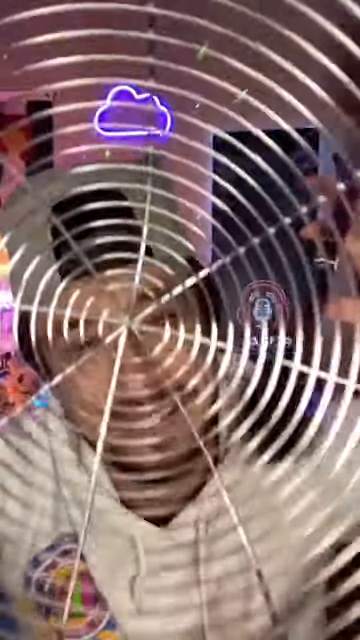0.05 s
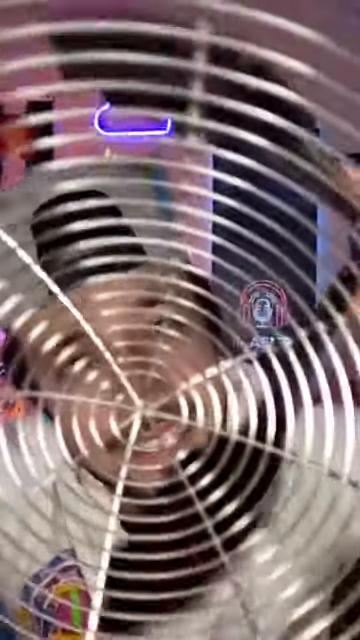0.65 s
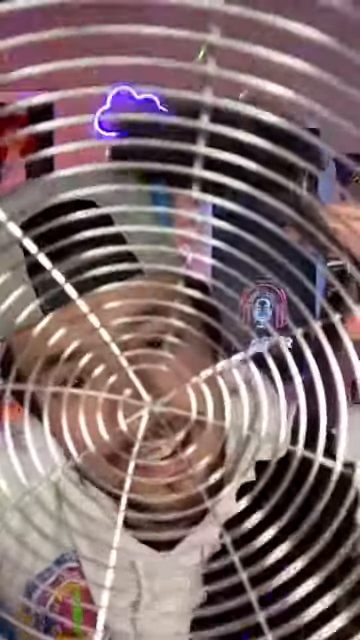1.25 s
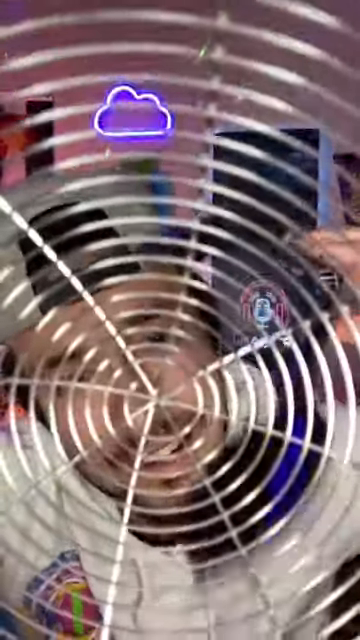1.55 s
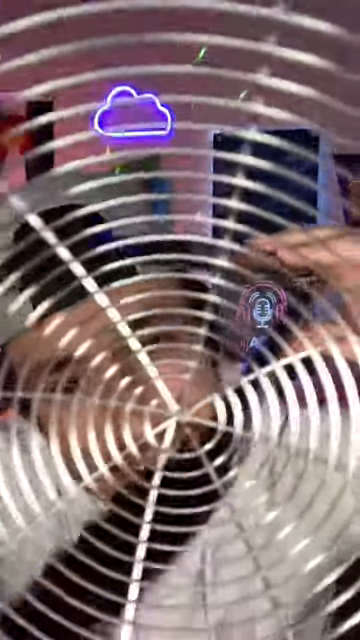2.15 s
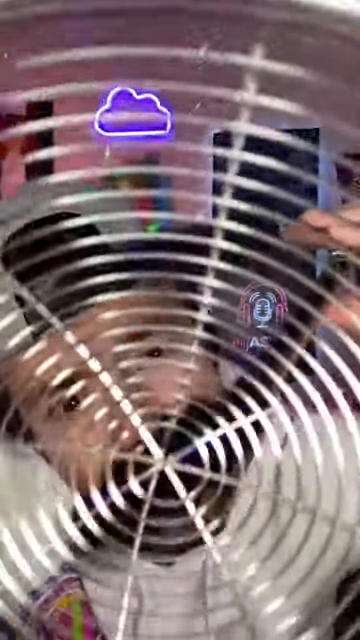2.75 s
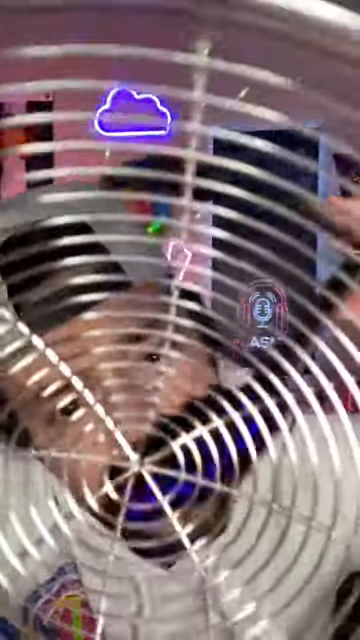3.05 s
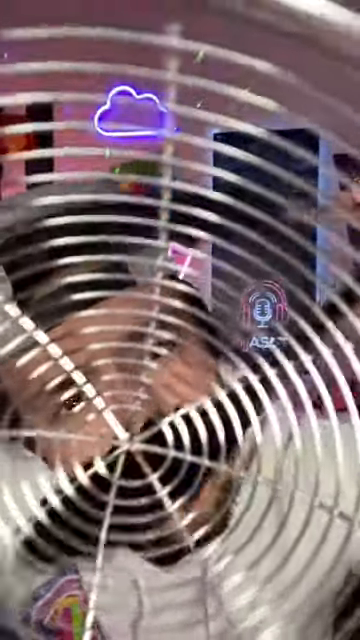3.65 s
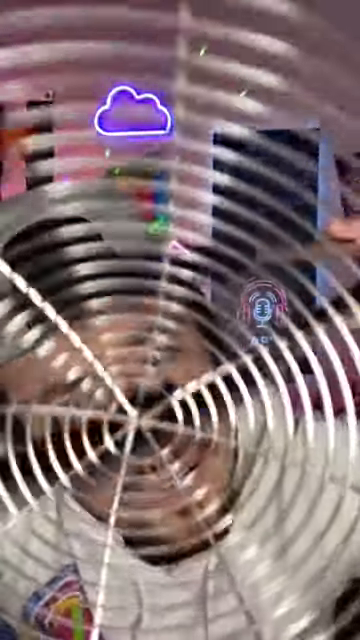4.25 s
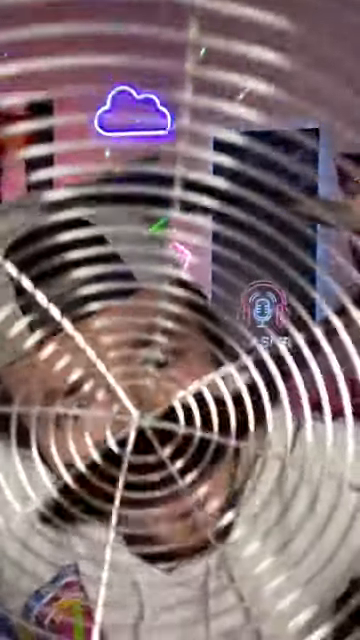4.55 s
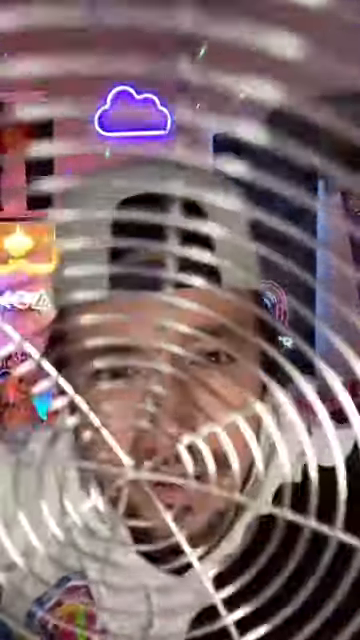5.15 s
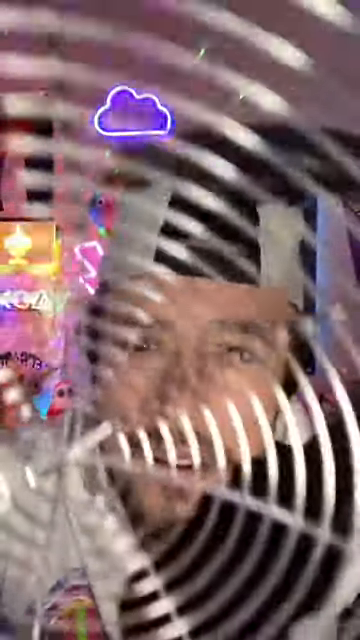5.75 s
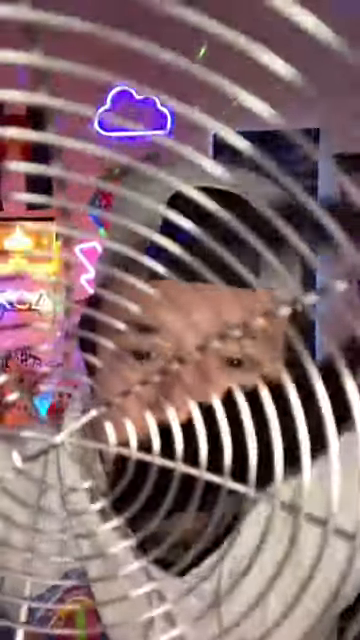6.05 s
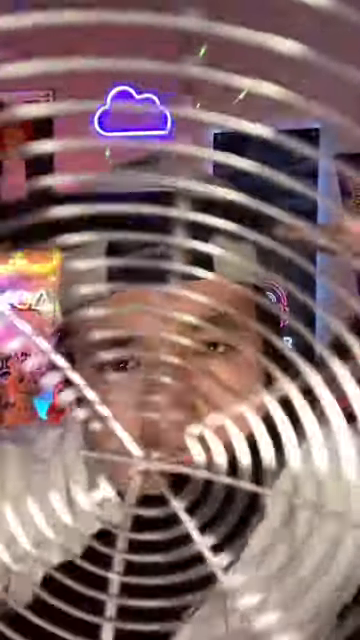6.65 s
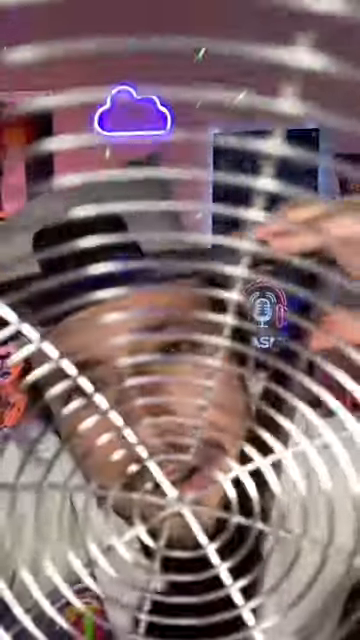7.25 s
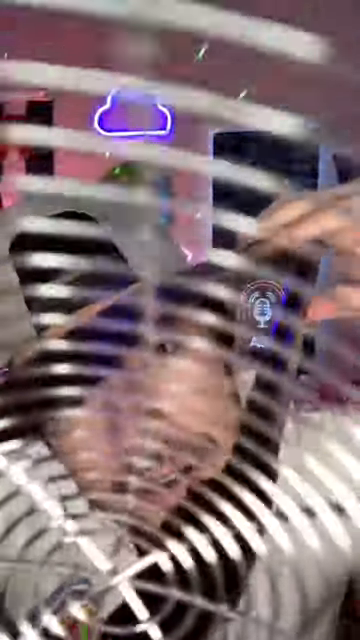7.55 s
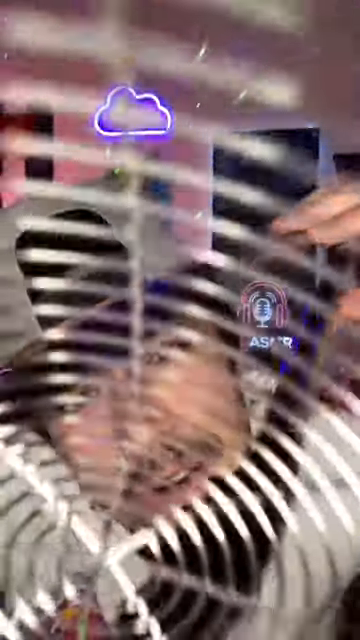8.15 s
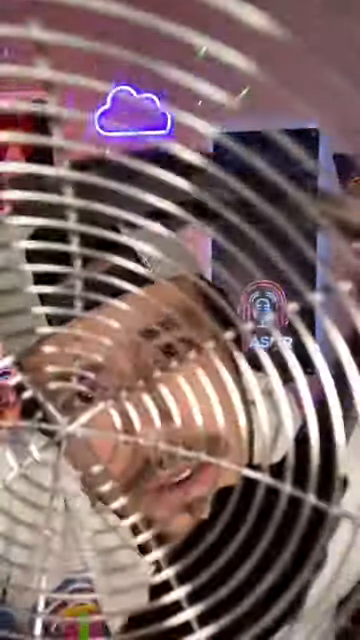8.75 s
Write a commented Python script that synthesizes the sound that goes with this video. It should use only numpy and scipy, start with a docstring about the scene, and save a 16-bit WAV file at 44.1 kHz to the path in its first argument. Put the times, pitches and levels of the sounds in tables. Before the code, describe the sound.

Close, uneven scraping and plucking of nails on a metal wire strainer, its wires ticking and ringing briefly over soft knocks.

```python
"""A faint room rumble, then close clicks: fingernails pick and scrape at a steel wire strainer.
Each wire that slips off a nail is released with an impulse, which knocks the basket and leaves the
other wires in free vibration. Between the clicks, sliding friction makes the nail grate along the steel.
Now and then a finger's weight sets the frame booming, or skin squeaks by stick-slip motion."""
import sys
import numpy as np
from scipy import signal
from scipy.fft import rfft, irfft, next_fast_len
from scipy.io import wavfile
from scipy.ndimage import uniform_filter1d

SR = 44100
rng = np.random.default_rng(int(sys.argv[2]) if len(sys.argv) > 2 else 0)


def wav_record(signal):
    """Record a signal, one row per channel, as 16-bit PCM in the file named by sys.argv[1]."""
    frames = np.transpose(np.atleast_2d(signal))
    bounded = np.clip(frames, -1, 1)
    # unit amplitude maps onto the largest positive 16-bit level
    quanta = np.round(bounded * 32767).astype(np.int16)
    wavfile.write(sys.argv[1], SR, quanta)


N = 388521


def amp(db):
    """Amplitude ratio of a level in decibels."""
    return 10 ** (np.asarray(db) / 20)


def unit(x):
    """Normalisation to rms 1."""
    return x / np.sqrt(np.mean(x ** 2) + 1e-20)


def along(points, hz):
    """Interpolation of (f/Hz, value) points on a logarithmic frequency axis."""
    f, v = np.transpose(points)
    return np.interp(np.log(hz + 1), np.log(np.sort(f)), v)


def clock(length):
    """Uniform sampling times over a length in seconds."""
    return np.arange(int(length * SR)) / SR


def fade(t, t60):
    """Exponential decay, 60 dB in t60 seconds."""
    return np.exp(-np.log(1000) * t / t60)


def add(track, s, sound):
    """Superposition of a sound on a track at time s."""
    part = track[max(int(s * SR), 0):][:len(sound)]
    part += sound[:len(part)]


def through(x, response):
    """Convolution with an impulse response scaled to unit energy."""
    return signal.fftconvolve(x, response / np.linalg.norm(response))[:N]


def colour(x, points, size=4096):
    """Minimum-phase filtering to a given spectrum, conserving the power of white noise."""
    cepstrum = irfft(np.log(amp(along(points, np.fft.rfftfreq(size, 1 / SR)))))
    cepstrum[1:size // 2] *= 2
    cepstrum[size // 2 + 1:] = 0
    return through(x, irfft(np.exp(rfft(cepstrum))))


def grit(count, spread_db=3):
    """Roughness noise of rms 1: tiny impacts of unequal size."""
    impacts = np.tanh(rng.standard_normal(count))
    return unit(impacts * amp(spread_db * np.clip(rng.standard_normal(count), -2, 2)))


# Background spectrum: f/Hz, relative level/dB
ROOM_SPECTRUM = [(20, -40), (60, 6.5), (85, -5), (200, -4), (450, -15), (1100, -20), (4000, -28),
                 (8000, -38), (16000, -34)]
def room(db=-63.0):
    """Stationary noise: a low rumble and faint hiss."""
    return amp(db) * unit(colour(rng.standard_normal(N), ROOM_SPECTRUM))


# Loudest slips of a nail off a wire: t/s, relative level/dB
LOUD_SLIPS = [(0.8744, -46.5), (0.905, -49.5), (1.104, -37), (1.1552, -38), (1.2275, -38.5),
              (1.2857, -35.5), (1.333, -39), (1.3509, -38.5), (1.412, -39.5), (1.4794, -37), (1.5298, -34),
              (1.5353, -36.5), (1.5644, -36.5), (1.9664, -32), (2.0097, -36.5), (2.0765, -39),
              (2.0995, -33), (2.1118, -34), (2.4137, -46), (2.6052, -47), (2.7465, -34.5), (2.7633, -29.5),
              (2.7813, -32.5), (2.8, -28.5), (3.1486, -48), (3.1877, -43), (3.2578, -44.5), (3.295, -31),
              (3.3541, -24.5), (3.8843, -37), (3.9655, -48.5), (4.0001, -47.5), (4.1348, -39),
              (4.2365, -28.5), (4.2947, -19.5), (4.4119, -32.5), (4.6338, -34), (4.724, -31),
              (4.7751, -33.5), (5.0843, -48.5), (5.1152, -40.5), (5.2142, -36), (5.232, -32.5),
              (5.2424, -31.5), (5.3029, -35.5), (5.4554, -40), (5.4776, -45), (5.691, -43.5),
              (5.726, -36.5), (5.8653, -30.5), (5.9284, -24.5), (5.9516, -27.5), (5.9827, -28.5),
              (6.2758, -40.5), (6.3099, -40.5), (6.3795, -37), (6.6512, -43.5), (6.6992, -40),
              (7.2133, -39.5), (7.265, -45), (7.4744, -37.5), (7.602, -39.5), (7.8417, -41.5), (8.059, -39),
              (8.2747, -37.5), (8.2901, -37), (8.522, -51.5), (8.6707, -30.5), (8.7379, -30),
              (8.8056, -28.5)]
def wire_slips(count=16, per_s=20, over_grating_db=1.5, spread_db=2):
    """Stick-slip events, loud ones and lesser ones along each stroke: t/s, click level/dB, knock level/dB."""
    rows = list(LOUD_SLIPS)
    for start, end, db, _, _ in NAIL_STROKES:
        times = start + (np.arange(count) + rng.random(count)) / per_s
        levels = db + over_grating_db - spread_db * rng.standard_normal(count)
        rows += [(s, level) for s, level in zip(times, levels) if s < end]
    s, db = np.transpose(rows)
    _, weight_db = finger(s)
    return np.column_stack([s, db, db + weight_db])


def clicks(slips, creep_db=-16, chatter_db=-6, rebound_s=0.003, gain_db=-13.0):
    """Elastic release: the nail creeps over a wire and snaps free; the wire chatters against the ribs."""
    force, t = np.zeros(N), clock(0.06)
    burst = lambda t60: unit(grit(len(t)) * fade(t, t60))
    for s, db, _ in slips:
        level = amp(db + gain_db)
        add(force, s - len(t) / SR, level * amp(creep_db) * burst(t60=0.023)[::-1])  # swells to the snap
        add(force, s, level * burst(t60=0.011))
        add(force, s + rebound_s * rng.random(), level * amp(chatter_db) * burst(t60=0.02))
    return force


# Spectrum of the direct sound: f/Hz, relative level/dB
CONTACT_SPECTRUM = [(60, -10.5), (250, -12.5), (550, 9), (760, 3), (960, -4), (1350, 2.5), (3200, 3),
                    (5400, -1), (6800, -7.5), (8300, -13), (15500, -15.5)]
def contact_sound(force):
    """Direct radiation: the nail's force is heard at once as clicks and grating."""
    return colour(force, CONTACT_SPECTRUM)


# Spectrum of the dense wire modes: f/Hz, relative level/dB
MESH_SPECTRUM = [(150, -21.5), (400, -1), (700, 3.5), (1000, -4.5), (1350, 0.5), (1900, -1.5), (3400, 2),
                 (5300, -4.5), (7500, -14.5), (15500, -19)]
# Their decay times: f/Hz, T60/s
MESH_DECAY = [(900, 0.29), (3000, 0.38), (7000, 0.26), (14000, 0.16)]
def mesh_ring(force, dense_db=-7, lingering_db=-15.0, lingering_t60=0.76):
    """Modal overlap: close wire modes merge into quickly decaying noise; a thinner cloud lingers."""
    hz, times, noise = signal.stft(rng.standard_normal(SR), SR, nperseg=256)
    decay = fade(times, along(MESH_DECAY, hz)[:, None])
    _, response = signal.istft(noise * decay, SR, nperseg=256)
    dense = colour(through(force, response), MESH_SPECTRUM)
    t = clock(0.72)
    tail = rng.standard_normal(len(t)) * fade(t, lingering_t60)
    lingering = colour(through(force, tail), [(700, -3), (1400, -8.0), (4800, -3.5), (12000, -29)])
    return amp(dense_db) * dense + amp(lingering_db) * lingering


# Least damped wire modes: f/Hz, relative level/dB
WIRE_MODES = [(1345, 0), (1480, -0.5), (2150, -4.5), (2466, 4), (2616, -0.5), (2740, -2.5), (2821, 0),
              (3144, 3), (3440, -0.5), (4086, 2), (4204, 0.5), (4301, -1.5), (4900, -0.5)]
def singing_wires(slips, gain_db=-39.0, t60=1.05, scatter_db=3.0):
    """Free vibration: the freest wires sing on, in a new balance after every click."""
    out, t = np.zeros(N), clock(1)
    hz, level = np.transpose(WIRE_MODES)
    modes = np.exp(2j * np.pi * hz[:, None] * t) * fade(t, t60)
    for s, db, _ in slips:
        strengths = amp(level + scatter_db * rng.standard_normal(len(hz)))
        phases = np.exp(1j * np.pi * rng.standard_normal(len(hz)))
        add(out, s, amp(db + gain_db) * ((strengths * phases) @ modes).real)
    return out


def struck(modes, attack_s, detune):
    """Modal superposition after one blow; the place of the finger shifts each pitch and strength."""
    t, ring = clock(0.25), 0
    for hz, db, t60 in modes:
        strength, shift, phase = rng.standard_normal(3)
        tone = np.sin(2 * np.pi * hz * (1 + detune * shift) * t + np.pi * phase)
        ring += amp(db + 2 * strength) * tone * fade(t, t60)
    return unit(ring * (1 - np.exp(-t / attack_s)))


# Bending modes of the basket: f/Hz, relative level/dB, T60/s
BASKET_MODES = [(86.3, -11.5, 0.2), (259, -6, 0.13), (379, 1, 0.039), (445.7, -6, 0.085),
                (551, -3.5, 0.062), (672, -20.5, 0.15), (761, -5, 0.038)]
def basket_knocks(slips, gain_db=-16):
    """Impulse excitation: each click kicks the whole basket."""
    out = np.zeros(N)
    for s, _, db in slips:
        add(out, s, amp(db + gain_db) * struck(BASKET_MODES, attack_s=0.00067, detune=0.055))
    return out


# Strokes of a nail over the wires, all levels relative: start t/s, end t/s, grating level/dB,
# edge level/dB (top treble), weight level/dB (basket knock against click)
NAIL_STROKES = [(0.876, 0.92, -49.5, 7, 0.5), (1.092, 1.247, -52.5, 1.5, -4.5),
                (1.274, 1.417, -49.5, 2.5, -4.5), (1.464, 1.571, -68, 4, -8), (1.97, 2.197, -44, -6.5, -11),
                (2.745, 2.841, -39.5, -2, -11.5), (3.18, 3.284, -56, 2, -5),
                (3.293, 3.348, -43.5, 5.5, -15.5), (3.665, 3.746, -51, -7.5, 2),
                (4.191, 4.361, -50, -8.5, -25), (4.373, 4.41, -51.5, 3, -10),
                (4.645, 4.821, -48.5, -1, -7.5), (5.084, 5.131, -50.5, 4.5, -2.5),
                (5.205, 5.322, -39, 1.5, -4.5), (5.447, 5.472, -49.5, 4.5, -3.5),
                (5.687, 5.751, -54, 0, -6), (5.862, 5.957, -72, 1.5, -6), (6.27, 6.453, -48.5, -5, -4),
                (6.677, 6.751, -44.5, -4, -4), (6.814, 6.91, -49, -9, 2.5), (6.957, 6.976, -55.5, -7, 1),
                (7.199, 7.311, -51, -9.5, -6.5), (7.36, 7.507, -44.5, 1.5, -2),
                (7.508, 7.608, -45.5, -2, -3.5), (7.84, 8.15, -42.5, 1.5, -2),
                (8.268, 8.305, -54.5, 1, -5.5), (8.647, 8.801, -68, 5, -5)]
def grating(catches_per_s=90, catch_t60=0.022, spread_db=3.5, slide=0.55, rise_s=0.0039, gain_db=-2.5):
    """Sliding friction: the nail hisses along the steel and catches on wire after wire, unevenly."""
    pressure = np.zeros(N)
    for start, end, db, _, _ in NAIL_STROKES:
        held = np.ones_like(clock(max(end - start, rise_s)))
        add(pressure, start + rise_s, amp(db + gain_db) * held)
    pressure = uniform_filter1d(pressure, int(2 * rise_s * SR) + 1)
    times = np.cumsum(rng.gamma(2, 0.5 / catches_per_s, size=2000))
    sizes = amp(spread_db * np.clip(rng.standard_normal(len(times)), -2, 2))
    catches = np.bincount((times * SR).astype(int), sizes, minlength=N)[:N]
    grip = unit(signal.fftconvolve(catches, fade(clock(0.5), catch_t60))[:N])  # a brief burst per catch
    return pressure * unit(np.hypot(grip, slide) * grit(N))


def finger(times, flick_edge_db=-11.5, flick_weight_db=-17.5, hold_s=0.0067):
    """Contact conditions: edge and weight levels of the stroke under way, or of a dull, light flick."""
    edge, weight = np.full(len(times), flick_edge_db), np.full(len(times), flick_weight_db)
    for start, end, _, edge_db, weight_db in NAIL_STROKES:
        held = (times > start - hold_s) & (times < end + hold_s)
        edge[held], weight[held] = edge_db, weight_db
    return edge, weight


def edge_gain():
    """Contact angle: as the finger rolls, more or less of the nail's edge meets the steel."""
    edge_db, _ = finger(np.arange(N) / SR)
    return amp(uniform_filter1d(edge_db, size=512))


def nail_edge(force, boost_db, corner_hz=7000):
    """Sharp contact widens the bandwidth: a nail's edge excites more top treble than its flat side."""
    hz = np.fft.rfftfreq(N, 1 / SR)
    treble = irfft(rfft(force) / (1 + (corner_hz / (hz + 1)) ** 8), N)
    return force + (amp(boost_db) * edge_gain() - 1) * treble


def rasp(drag, squeal_db=-1, hollow_db=-6.0):
    """Forced resonance: the flat of the nail bows a stiff wire span; its edge shakes the hollow basket."""
    t = clock(0.5)
    ring = lambda hz, t60: np.sin(2 * np.pi * hz * t) * fade(t, t60)
    flatness = np.clip(1 - 1.43 * edge_gain(), 0, 1)
    squeal = through(drag * flatness, ring(hz=3400, t60=0.017))
    hollow = through(drag * (1 - flatness), ring(hz=420, t60=0.024))
    return amp(squeal_db) * squeal + amp(hollow_db) * hollow


# Bending modes of the frame: f/Hz, relative level/dB, T60/s
FRAME_MODES = [(217, -1.5, 0.14), (246.5, -3, 0.17), (296, -6, 0.13)]
# Hard presses of a finger on the frame: t/s, relative level/dB
FRAME_PRESSES = [(1.569, -45), (1.968, -47.5), (2.166, -46), (2.783, -42), (3.352, -43), (3.781, -47.5),
                 (4.138, -48), (4.297, -41.5), (4.422, -45), (4.64, -52.5), (5.302, -50), (5.959, -38.5),
                 (6.704, -45.5), (6.874, -44.5), (7.264, -50), (7.85, -45), (7.923, -50.5), (8.281, -52)]
def frame_booms(swell_s=0.00653, gain_db=-8.0):
    """Compliant contact: the finger's weight acts through soft skin, so the frame's boom swells in."""
    out = np.zeros(N)
    for s, db in FRAME_PRESSES:
        boom = struck(FRAME_MODES, attack_s=swell_s / 2, detune=0.042)
        add(out, s - swell_s, amp(db + gain_db) * boom)
    return out


# Squeaks of a fingertip: t/s, f/Hz, level/dB, duration/s
SKIN_SQUEAKS = [(2.401, 1840, -56, 0.0092), (3.651, 3660, -56, 0.051), (3.777, 1660, -44.5, 0.012),
                (4.862, 1390, -46, 0.0051)]
def squeaks(waver=0.093):
    """Stick-slip oscillation: skin on steel gives short, rough chirps."""
    out = np.zeros(N)
    for s, hz, db, length in SKIN_SQUEAKS:
        count = len(clock(length))
        jitter = unit(uniform_filter1d(rng.standard_normal(count), size=30))
        phase = 2 * np.pi * np.cumsum(hz * (1 + waver * jitter)) / SR
        add(out, s, amp(db) * unit(np.hanning(count) * np.sin(phase)))
    return out


def scene():
    """Source and resonator: clicks and grating are heard directly and through the ringing strainer."""
    drag, slips = grating(), wire_slips()
    force = nail_edge(clicks(slips), boost_db=3.5) + nail_edge(drag, boost_db=-1.5)
    wires = contact_sound(force) + mesh_ring(force) + singing_wires(slips)
    return (wires + basket_knocks(slips) + rasp(drag) + frame_booms() + squeaks() + room())[None]


# Microphone response: f/Hz, level/dB
MIC_RESPONSE = [(8300, 1), (8900, -6), (11800, -7.5), (13300, 3), (15500, 2.5), (16300, -21)]
def record(dry, limit_hz=16500):
    """Frequency response: the microphone has a dip in the high treble and a steep band limit."""
    size = next_fast_len(N + SR)
    hz = np.fft.rfftfreq(size, 1 / SR)
    response = amp(along(MIC_RESPONSE, hz)) * (hz < limit_hz)
    return irfft(rfft(dry, size) * response, size)[:, :N]


dry = scene()
out = record(dry)
wav_record(out)
```